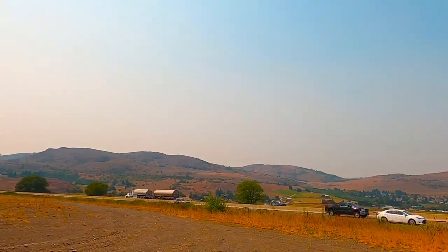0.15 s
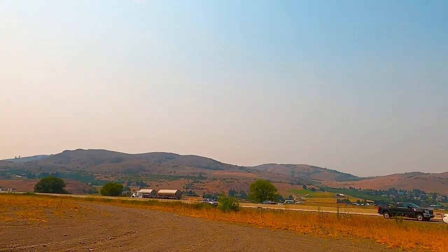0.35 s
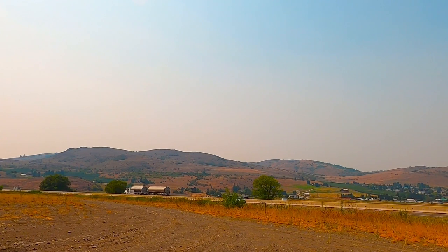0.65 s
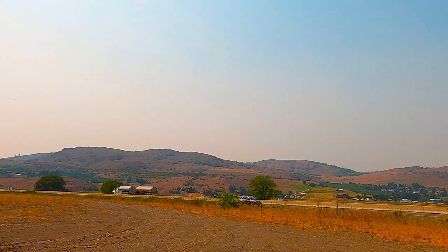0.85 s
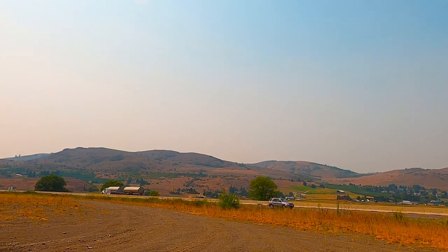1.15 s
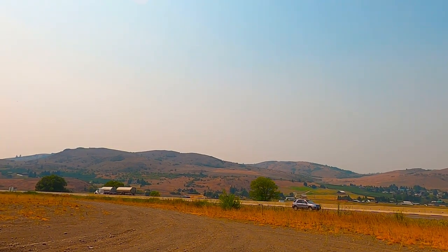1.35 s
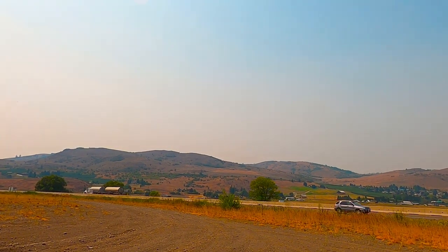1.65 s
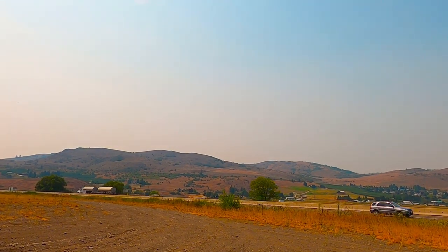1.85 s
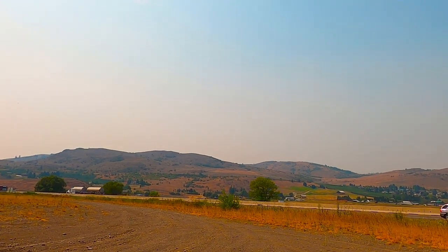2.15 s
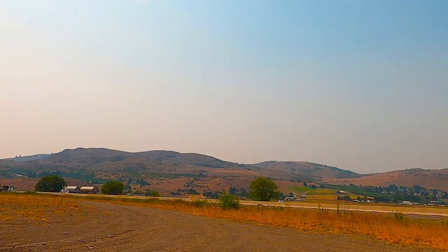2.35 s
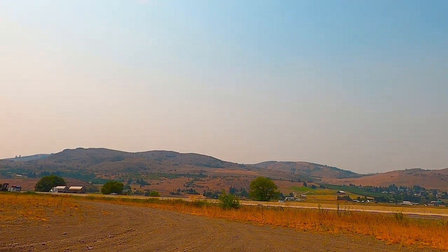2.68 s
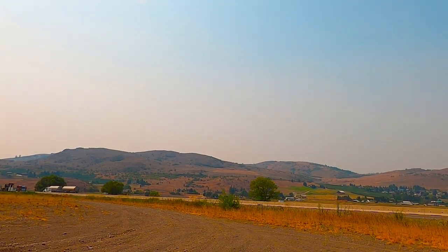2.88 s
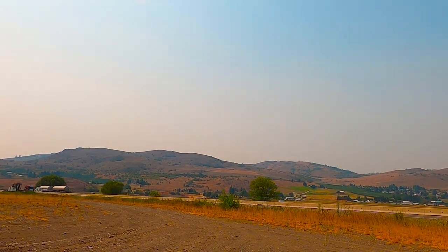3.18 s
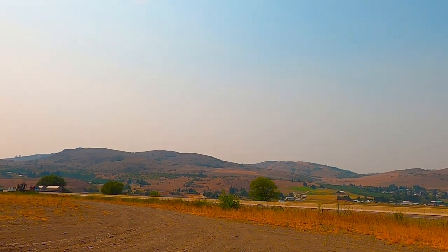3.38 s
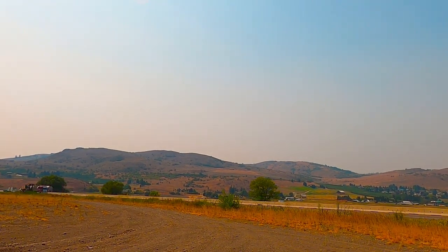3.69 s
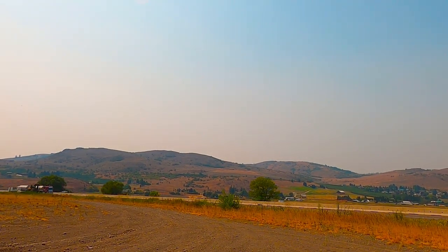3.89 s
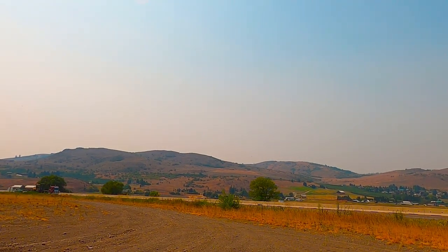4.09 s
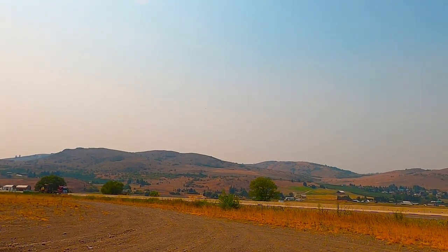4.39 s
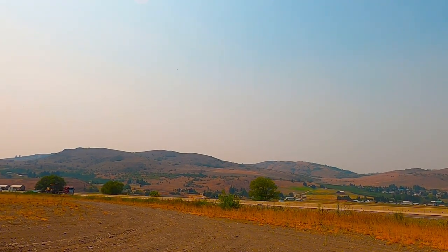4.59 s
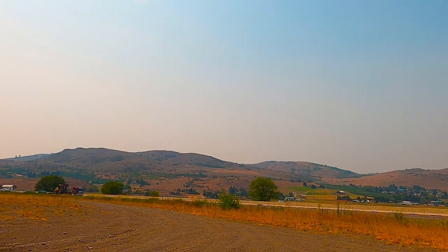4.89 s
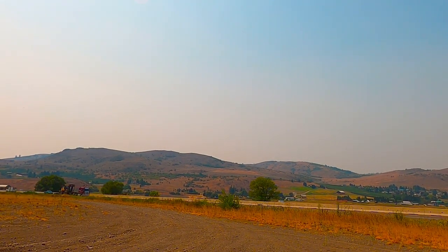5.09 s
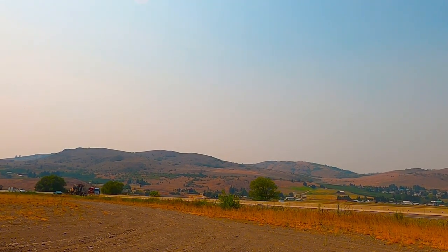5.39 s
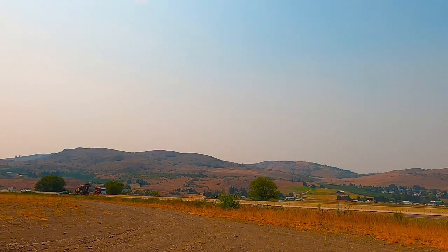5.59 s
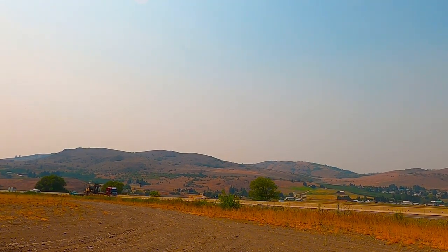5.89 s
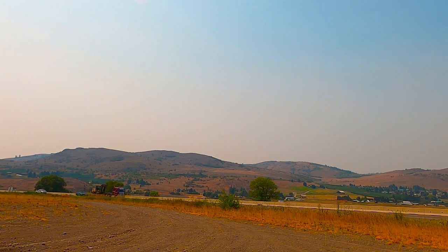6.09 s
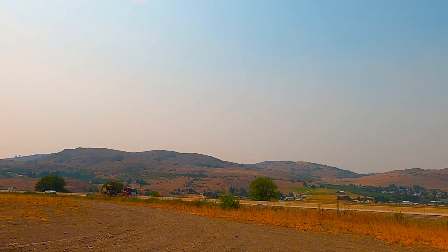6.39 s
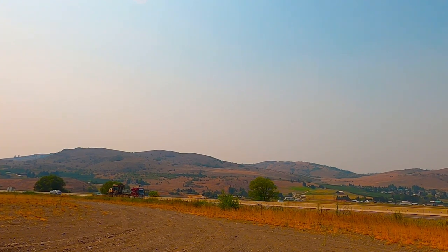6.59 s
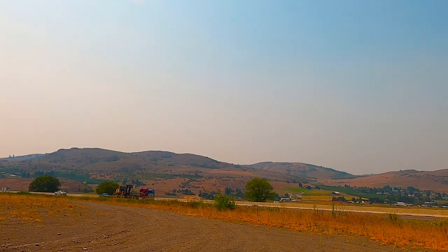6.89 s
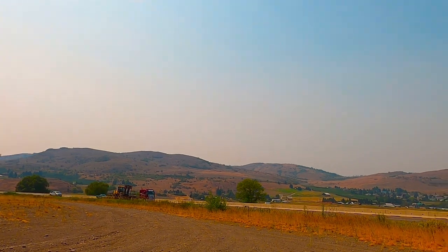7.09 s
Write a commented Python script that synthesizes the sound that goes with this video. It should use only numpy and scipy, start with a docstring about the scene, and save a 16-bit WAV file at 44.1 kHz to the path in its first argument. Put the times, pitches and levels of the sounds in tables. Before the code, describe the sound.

An open field beside a highway, heard from some distance. From 0 s passing cars give a low roar and soft, airy tyre hiss; a faint hum slides down around 0.5 s as one leaves. More cars swish by near 1, 2 and 2.5 s, one hiss throbbing quickly. At about 1.25 s a tiny, dry, rattling double snap sounds close to the microphone. Low road rumble surges around 1 s, and again more gently later. Beneath everything a diesel truck drones near 170 Hz, wavering with distance, rising from 2 s and growing markedly after 5 s to its strongest at 6.4-7.2 s, with thin whining tones and renewed roar. Another brief close snap comes at 6.8 s. The sound is mono until about 3.8 s, then widens over 1.5 s; low wind buffeting freshens towards the end, which arrives with the truck still approaching.

```python
"""A six-cylinder diesel truck drones nearer along a highway across a dry field: a comb of crank-turn tones
over a noise roar. Cars hiss past in coloured noise that swells and fades, with thin tones and low rumble.
Something small snaps twice close by: short pushes ring a set of modes. Wind noise buffets the microphone
ports. The sound starts in mono, and the sides fade in from about half-way."""
import sys
import numpy as np
from scipy import signal
from scipy.fft import rfft, irfft, next_fast_len
from scipy.io import wavfile
from scipy.ndimage import uniform_filter1d, map_coordinates

SR = 44100
rng = np.random.default_rng(int(sys.argv[2]) if len(sys.argv) > 2 else 0)


def store_pcm(level_fs):
    """Save levels as 16-bit WAV."""
    pcm = np.round(np.clip(level_fs, -1, 1) * 32767).astype(np.int16)
    wavfile.write(sys.argv[1], SR, np.atleast_2d(pcm).T)


N = 319725

# Noise spectra below give relative levels per Hz.
# The truck's approach, which drives its tones: t/s, drone level/dB
TRUCK_APPROACH = [(0, -25), (.6, -25), (2.1, -23.5), (2.5, -20.5), (3.8, -19), (4.2, -19), (6, -16.5),
                  (6.35, -14), (7.25, -14)]
# Exhaust tones: multiple of the crank turn, level/dB at the reference drone, share of the drone's swell
EXHAUST_ORDERS = [(3, -36, 0.05), (5, -37.5, .6), (6, -19, 1), (8, -42, 1), (9, -39.5, .7), (10, -49, .9),
                  (12, -48, 1), (13, -51, .6), (16, -56, .9)]
# Orders that stand out as the path over the ground changes: multiple, loudest t/s, lift/dB, half-lift time/s
ORDER_LIFTS_OVER_GROUND = [(9, 3.2, 4, .4), (9, 4.5, 4, .3), (9, 6.95, 4.5, .4), (8, 5.3, 1, 0.2),
                           (8, 6.2, 4.5, 0.21), (8, 1.5, 5, 0.38), (12, 6.2, 5, 0.54)]
# Spectrum of the tyre and body roar: f/Hz, level/dB
ROAR_SPECTRUM = [(70, -30), (110, -7), (150, 1), (200, -2.5), (300, -8.5), (400, -12), (470, -15),
                 (700, -27.5), (1000, -35.5)]
# Roar as traffic leaves, rolls on, and the truck arrives: nearest t/s, level/dB, half-power time/s
ROAR_PASSES = [(.4, -25, 1.6), (3.8, -31, 1.), (5.6, -29, 0.53), (7.3, -22, .5)]
# Thin tones that come and go, some probably high multiples of the engine turn, and a leaving car's hum:
# loudest t/s, level/dB, half-amplitude time/s, f/Hz when loudest, glide/(Hz/s)
THIN_TONES = [(0.5, -40.5, 2.9, 307, 0.23), (3.5, -37.5, 0.72, 303.5, .2), (4.65, -35, 0.3, 303.5, 1),
              (7, -31.5, 0.5, 303.3, 0.5), (5.25, -36, .35, 398, 1.5), (4.3, -42.5, 0.39, 397, 0),
              (6.5, -40.5, 0.79, 396, 0), (7.31, -31, .3, 397, 0), (0.21, -36, 0.28, 422, -0.5),
              (1.2, -35, .4, 420.7, -1), (3.5, -43, 0.7, 419.1, 0), (0.57, -33.5, 0.37, 153, -19.5),
              (1.3, -41.5, 0.7, 324, -1)]
# Cars: nearest t/s, tyre level/dB, treble level/dB, time/s to half the tyre power and half the treble amplitude
CAR_PASSES = [(0.201, -34.5, -52.5, .4), (.95, -36.5, -49, 0.77), (1.9, -38.5, -53.5, 0.54),
              (2.5, -40.5, -47.5, 0.3), (2.86, -45, -45, 0.13), (3.4, -41, -53, .4),
              (4, -42.5, -53.5, 0.94), (4.75, -40, -63, 0.47), (6.099, -42.5, -58, 0.7),
              (7, -50.5, -57, .6)]
# Spectrum of the tyre noise: f/Hz, level/dB
TYRE_SPECTRUM = [(210, -28.5), (350, -17), (409, -6.5), (452, -9.5), (651, -11), (1100, -13), (1860, -18),
                 (2490, -26), (3100, -29.5), (4030, -41.5), (6820, -120)]
# Spectrum of the cars' hiss: f/Hz, level/dB
TREBLE_SPECTRUM = [(1500, -20.5), (2300, -9), (3200, -7), (4000, -10), (4600, -13.5), (5500, -18),
                   (6800, -26), (8000, -32), (9000, -35.5), (10500, -37.5), (12000, -69)]
# Tilt of the hiss about 4 kHz through the air: t/s, tilt/(dB/kHz)
AIR_TILT = [(0, 1.65), (2, 1.8), (2.6, 1), (4, 0), (7.25, 0)]
# Ground echo in the tyre noise: t/s, depth of the dip/dB, upper hump/dB
GROUND_ECHO = [(0, 2, 1.5), (.8, 4, 0.5), (1.6, -3.5, 0), (2.2, -1, 1), (3.2, 2.5, 0), (4.6, 5.5, 0),
               (5.5, 1, 1), (6.3, 6, 2), (7.25, -0.5, -0.5)]
# Blows within the snaps: t/s, drive level/dB, rattle length/ms, lowest f/Hz, highest f/Hz reached
SNAP_BLOWS = [(1.243, -38, 9, 1800, 4600), (1.2645, -24.5, 11, 2300, 3700), (1.2645, -21, 7, 5700, 6500),
              (1.2695, -22, 8, 4050, 11000), (1.270, -19, 9, 1450, 2100), (1.273, -19.5, 9, 250, 1200),
              (1.288, -30, 6, 1600, 2100), (6.785, -40, 8, 2300, 3400), (6.785, -45, 7, 4500, 10000),
              (6.803, -44, 5, 2800, 4200), (6.823, -19.5, 5, 2200, 9500), (6.8225, -20, 4, 1250, 1820),
              (6.825, -23.5, 14, 550, 1450), (6.830, -20, 5, 250, 480), (6.828, -30, 9, 2200, 7000),
              (6.8325, -23, 5, 1600, 1870)]
# Modes of the small part that rings: f/Hz, level/dB, 60 dB decay time/s
SMALL_PART_MODES = [(360, 0, .02), (610, -6, .025), (750, -11, .02), (870, -10, .02), (1040, -6, .02),
                    (1340, -8, .015), (1545, -9, .015), (1790, -8, .012), (1880, -1, .016),
                    (2390, -13, .01), (2550, -7, .016), (2980, -13, .01), (3380, -10, .012),
                    (4020, -10, .01), (4170, -11, .012), (4530, -19, .008), (4870, -21, .008),
                    (5350, -22, .008), (5600, -22, .008), (6070, -21, .012), (6800, -33, .008),
                    (7500, -32, .008), (8450, -25, .014), (8750, -29, .01), (10000, -36, .01)]
# Spectrum of the road rumble: f/Hz, level/dB
RUMBLE_SPECTRUM = [(10, -35.5), (18, -8.5), (35, -6.5), (65, -2.5), (100, -4.5), (130, -11), (180, -28)]
# Surges of the rumble: loudest t/s, level/dB, half-amplitude time/s
RUMBLE_SURGES = [(0, -36, .3), (1.1, -23, 0.34), (2, -26, 0.32), (3.5, -28, 0.69), (6.1, -26, .3),
                 (7.25, -26, .2)]
# Spectrum of the wind at the ports: f/Hz, level/dB
WIND_SPECTRUM = [(10, -19.5), (18, -9.5), (60, 0), (90, -1), (130, -20), (200, -24), (350, -27.5),
                 (550, -40), (800, -52)]
# Gusts: loudest t/s, level/dB, half-power time/s
WIND_GUSTS = [(4.2, -34, .15), (4.9, -35, .1), (5.15, -32.5, .1), (5.7, -35, .15), (6.25, -31, .15),
              (6.75, -30.5, .1), (7.2, -29.5, .1)]

T, SIZE = np.arange(N) / SR, next_fast_len(N)
HZ = np.arange(SIZE // 2 + 1) * SR / SIZE + 1  # 1 Hz up, to keep logarithms finite


def truck_drone():
    """Firings that repeat every crank turn give a comb of tones; the pipe favours the sixth."""
    reference_db = -19.5  # drone level at which the order levels hold
    # the crank turn rate creeps up to a top at 4.85 s and eases
    turn_hz = 28.28 - .0158 * (T - 4.85) ** 2
    (drone_db,) = curve(TRUCK_APPROACH)
    # the further and fainter the truck, the more the air breaks up its drone
    flutter_db = .25 * np.clip(reference_db - drone_db, 0, 8) * walk(26)
    # the crank speeds and slows once a turn, which swings the sixth order's pitch
    wobble_hz = 5.5 * np.cos(2 * np.pi * np.cumsum(turn_hz) / SR)
    comb = 0
    for order, db, share in EXHAUST_ORDERS:
        if order == 6:
            voice = tone(order * turn_hz + wobble_hz, .3, .1) * undb(flutter_db)
        else:  # weaker orders come from uneven cylinders and waver more
            voice = tone(order * turn_hz, 1.3, .2)
        lift_db = sum(lift * swell(s, half_s) for lifted, s, lift, half_s in ORDER_LIFTS_OVER_GROUND
                      if round(lifted) == order)
        comb = comb + undb(db + lift_db + share * (drone_db - reference_db)) * voice
    return comb


def roar():
    """Tyres and bodies roar as low noise, swelling with each passage."""
    return passing(ROAR_PASSES) * noise(ROAR_SPECTRUM, 0.51, 6.5)


def cars():
    """Tyre roar with a hump and a dip that slide with the ground echo; the air tilts the treble."""
    tyre_gain = passing([(s, db, half_s) for s, db, _, half_s in CAR_PASSES])
    hiss_gain = passing([(s, db, half_s) for s, _, db, half_s in CAR_PASSES], power=2)
    # the tyre hump climbs as the cars draw away: 47 Hz/s from 850 Hz, up to 1150 Hz
    hump_hz = np.minimum(850 + 47 * T, 1150)
    (air_db,), (dip_db, upper_db) = curve(AIR_TILT), curve(GROUND_ECHO)
    # one car's hiss throbs, perhaps once a wheel turn
    throb_db = 1.6 * swell(2.6, .35) * np.cos(2 * np.pi * 8.5 * (T - 2.845))

    def bell(hz, centre_hz):
        """A hump about half an octave to either side of its centre."""
        return np.exp(-(np.log2(hz / centre_hz) / .5) ** 2)

    def ground_db(hz):
        """Echo off the ground: a sliding hump, a dip below it and a fixed upper hump."""
        hump = 3.34 * bell(hz, hump_hz)
        dip = dip_db * bell(hz, 0.55 * hump_hz)
        return hump - dip + upper_db * bell(hz, 1950)

    tyres = noise(TYRE_SPECTRUM, 1.0, 5, ground_db)
    treble = noise(TREBLE_SPECTRUM, .7, 7, lambda hz: air_db * (hz - 4000) / 1000)
    return tyre_gain * tyres + hiss_gain * undb(1.1 * walk(18) + throb_db) * treble


def thin_tones():
    """Thin sines, steady or gliding, that swell and fade."""
    return sum(undb(db) * swell(s, half_s) * tone(hz + glide * (T - s), 1.5, .2)
               for s, db, half_s, hz, glide in THIN_TONES)


def snaps():
    """Short rattles push the modes of a small part within their reach; a little scratch rides on top."""
    out, t = np.zeros(N), T[:2048]
    for s, db, ms, low_hz, high_hz in SNAP_BLOWS:
        attack = np.minimum(t * 3000 / ms, 1)  # a third of the rattle length
        push = np.exp(-(t * 1000 / ms) ** 2) * attack
        reach = signal.butter(3, [low_hz, high_hz], "band", fs=SR, output="sos")
        ring = 0
        for hz, mode_db, t60_s in SMALL_PART_MODES:
            envelope = signal.lfilter([1], [1, -1000 ** (-1 / (t60_s * SR))], push)
            envelope = envelope / envelope.max()
            grit = uniform_filter1d(rng.standard_normal(len(t)), size=25)
            scratch = 1 + undb(-6) * 5 * grit  # 5 restores the level lost in smoothing
            mode = np.sin(2 * np.pi * (hz * t + rng.random()))
            ring = ring + undb(mode_db) * envelope * scratch * mode
        start = int(s * SR)
        out[start:start + len(t)] += undb(db) * signal.sosfilt(reach, ring)
    return out


def rumble():
    """Low rumble of the road that surges now and then."""
    steady = undb(-27 + 0.2 * walk(2.8))
    return np.hypot(steady, passing(RUMBLE_SURGES, power=2)) * noise(RUMBLE_SPECTRUM, 0.78, 1.6)


def wind():
    """Wind on one port against the other: low noise that freshens, with gusts on top."""
    steady = undb(-45.5 + 5 * (T - 4))  # freshens by 5 dB/s
    buffeting = undb(2.5 * walk(8))
    return np.hypot(steady, passing(WIND_GUSTS)) * buffeting * noise(WIND_SPECTRUM, 2.2, 7.0)


def undb(db):
    """Amplitude gain of a level in dB."""
    return np.exp(np.asarray(db) * np.log(10) / 20)


def curve(rows):
    """Columns of a table after its times, one value per sample."""
    s, *columns = np.transpose(rows)
    return [np.interp(T, s, c) for c in columns]


def walk(rate):
    """Random levels joined smoothly, rate new ones a second (40 at most)."""
    knots = rng.standard_normal(400)
    coarse = T[::64]
    return np.interp(T, coarse, map_coordinates(knots, [coarse * min(rate, 40.)], order=2))


def noise(spectrum, flicker_db, rate, colour_db=lambda hz: 0):
    """Noise of rms 1 before its half-octave bands flicker, partly with a neighbour, and are coloured in time."""
    hz, db = np.transpose(spectrum)
    shape_db = np.interp(np.log(HZ), np.log(hz), db, left=-200, right=-200)
    full = rfft(rng.standard_normal(SIZE)) * undb(shape_db)
    octave = np.log2(HZ)
    out, norm, last = 0, np.std(irfft(full, SIZE)), walk(rate)
    for step in range(int(2 * np.log2(min(hz))), int(2 * np.log2(max(hz))) + 2):
        window = np.cos(np.clip(2 * octave - step, -1, 1) * np.pi / 2) ** 2
        own = walk(rate)
        band_db = flicker_db * (own + last) / np.sqrt(2) + colour_db(2 ** (step / 2))
        out = out + irfft(full * window, SIZE)[:N] * undb(band_db)
        last = own
    return out / norm


def tone(hz, waver_db, drift_rad):
    """A sine, rms 1 before its level and phase wander as the air between stirs."""
    phase = 2 * np.pi * (np.cumsum(hz) / SR + rng.random()) + drift_rad * walk(3)
    return np.sqrt(2) * np.sin(phase) * undb(waver_db * walk(6))


def shaped(x, gain):
    """Filter by a gain for each frequency."""
    return irfft(rfft(x, SIZE) * gain, SIZE)[:N]


def swell(s, half_s):
    """A rise to 1 at time s, with half left half_s (0.05 s at least) to either side."""
    return 1 / (1 + ((T - s) / max(half_s, .05)) ** 2)


def passing(rows, power=1):
    """Gain of swells whose powers add; the swell shapes power (1) or amplitude (2)."""
    return np.sqrt(sum(undb(db) ** 2 * swell(s, half_s) ** power for s, db, half_s in rows))


def scene():
    """The treble is a little louder and later at the left port; wind is stronger at the right one."""
    road, drone, snap, gusts = cars(), truck_drone(), snaps(), wind()
    front = drone + roar() + thin_tones() + road + rumble() + snap - .3 * gusts
    # between ports: up to 2 dB from 700 to 2800 Hz, and 22 microseconds; half goes to each
    lift_db = 2 * np.clip(np.log2(HZ / 700) / 2, 0, 1)
    lean = undb(lift_db / 2) * np.exp(-1j * np.pi * HZ * 2.2e-5)
    # scattered car noise: the same sound with shuffled phases, more of it in the treble
    shuffle = np.exp(1j * np.cumsum(rng.standard_normal(len(HZ))) * .25)
    spread = shaped(road, shuffle * np.clip(HZ / 2500, 0, 1.5))
    # the drone is most out of step between the ports as the truck draws level
    drone_side = undb(-28) * swell(6.5, 1.2) * np.roll(drone, shift=50)
    snap_side = undb(-17) * np.roll(snap, shift=9)  # snaps come from one side
    side = undb(-11) * spread + drone_side + gusts + snap_side
    return np.array([shaped(front, lean) + side, shaped(front, 1 / lean) - side])


def record(dry):
    """The sound starts in mono and the sides fade in later; the microphone is dull and the top is cut."""
    # from 3.78 s the sides come in over 1.5 s, fast at first, then slowly
    opening = np.clip((T - 3.78) / 1.5, 0, 1) ** 0.67
    mid, side = (dry[0] + dry[1]) / 2, (dry[0] - dry[1]) / 2 * opening
    microphone = signal.butter(6, 9000, fs=SR, output="sos")
    dull = signal.sosfilt(microphone, np.array([mid + side, mid - side]))
    top_cut = signal.ellip(8, .2, 70, 15700, fs=SR, output="sos")
    return signal.sosfilt(top_cut, dull)


dry = scene()
out = record(dry)
store_pcm(out)
```